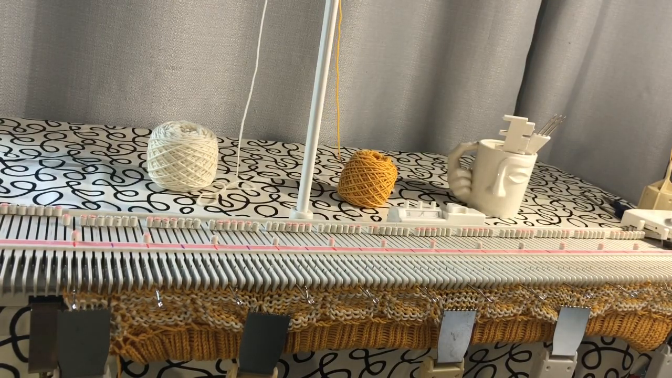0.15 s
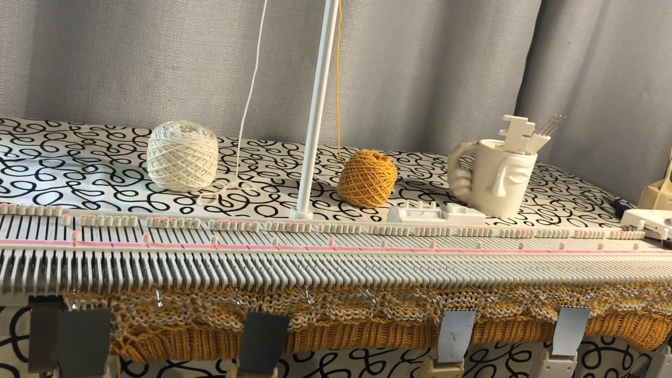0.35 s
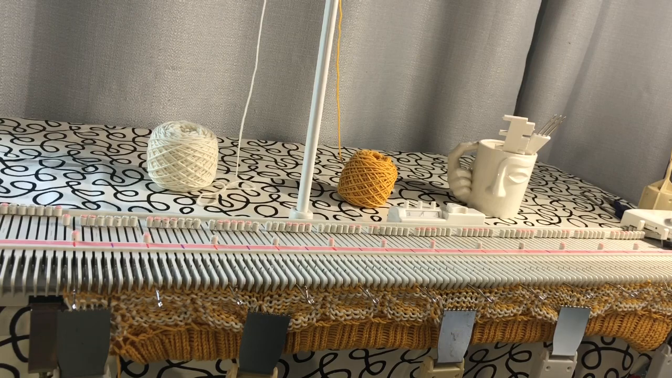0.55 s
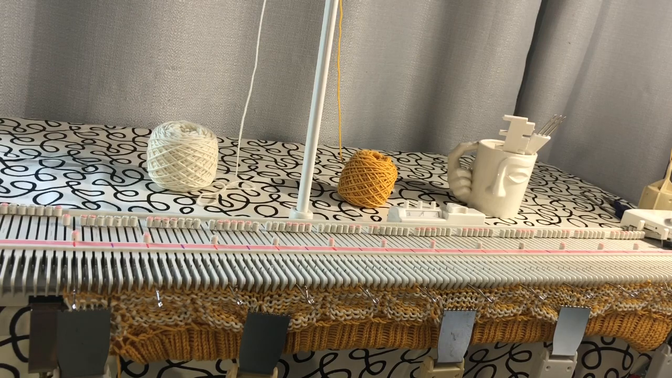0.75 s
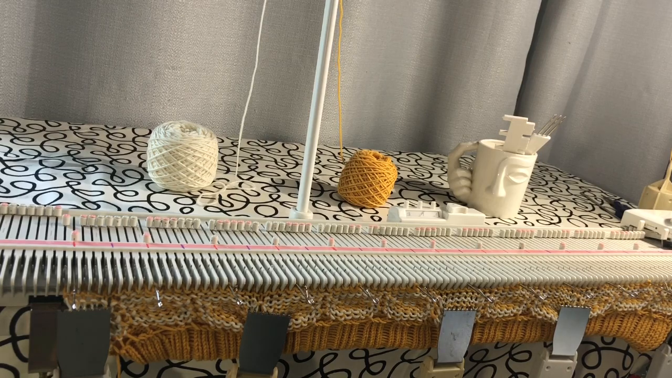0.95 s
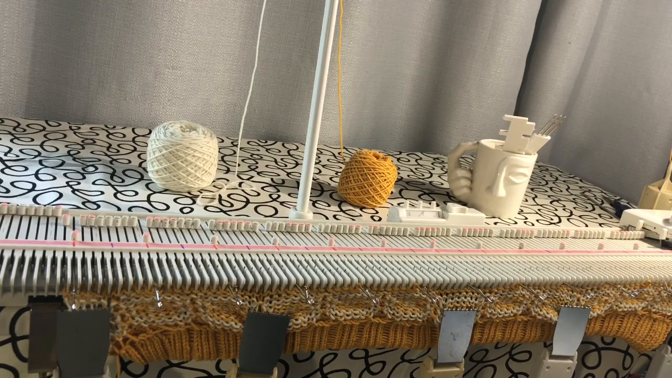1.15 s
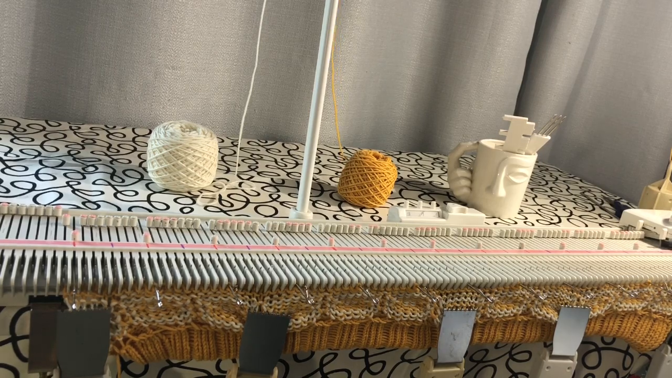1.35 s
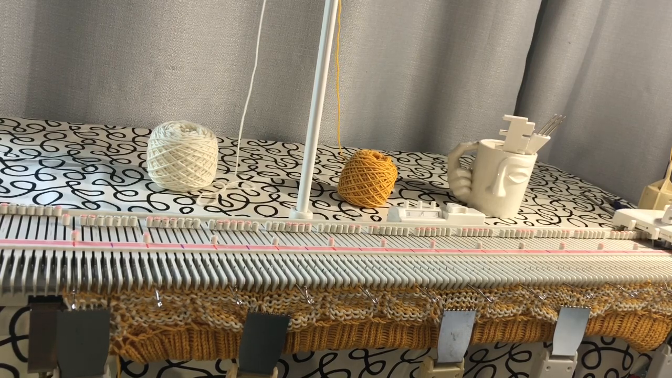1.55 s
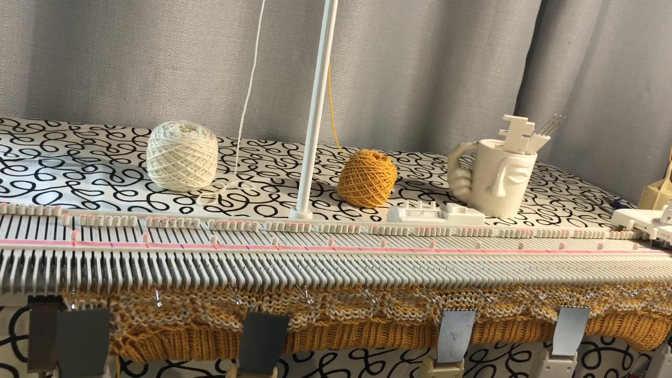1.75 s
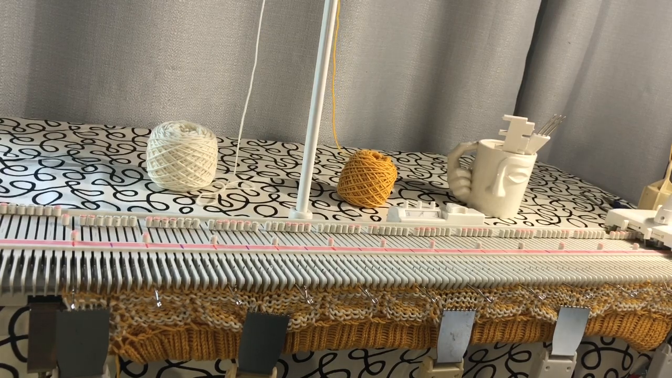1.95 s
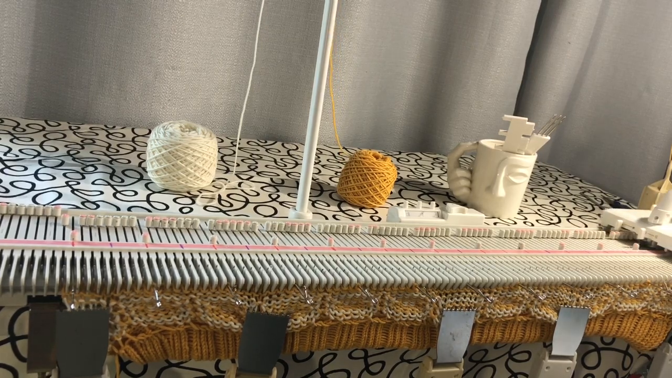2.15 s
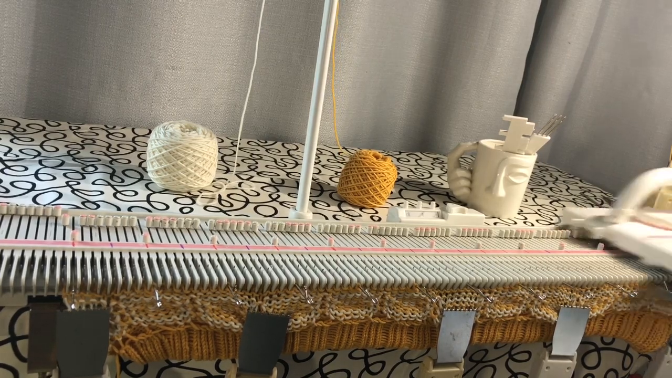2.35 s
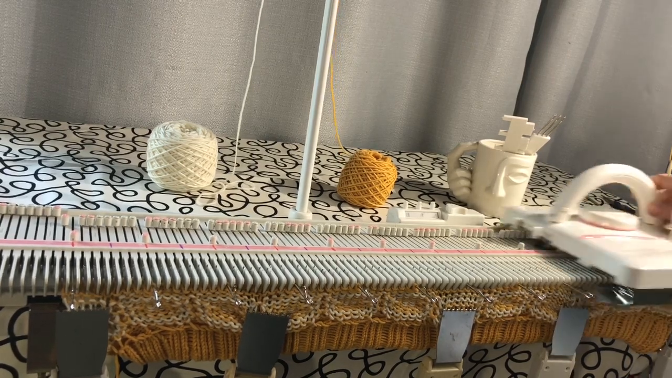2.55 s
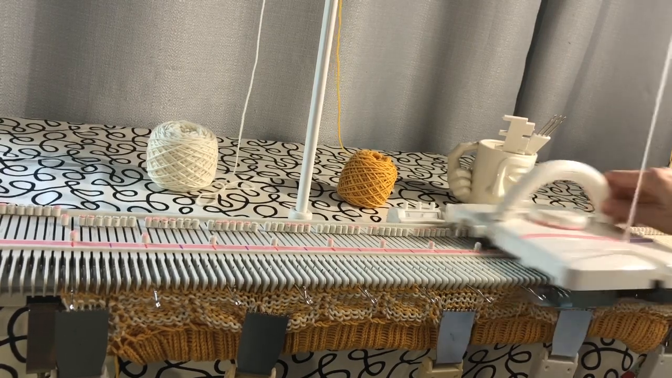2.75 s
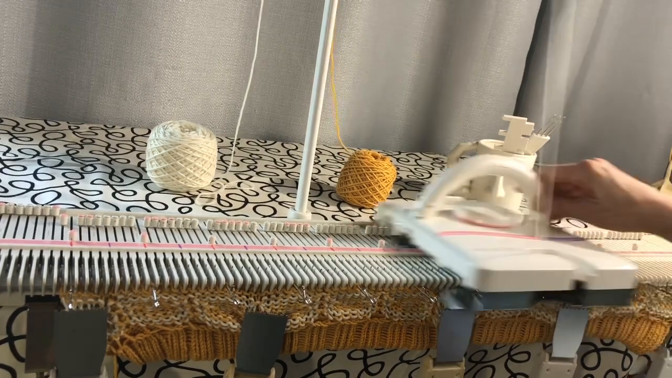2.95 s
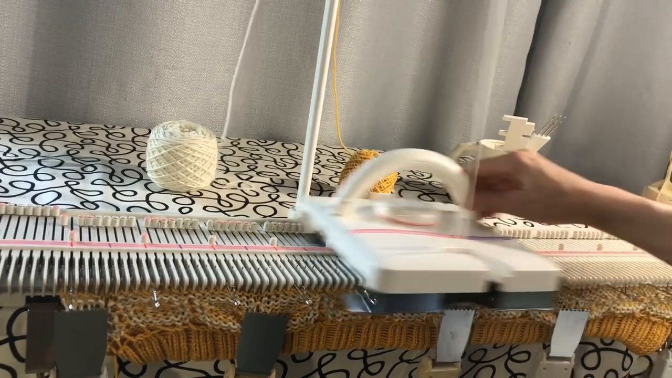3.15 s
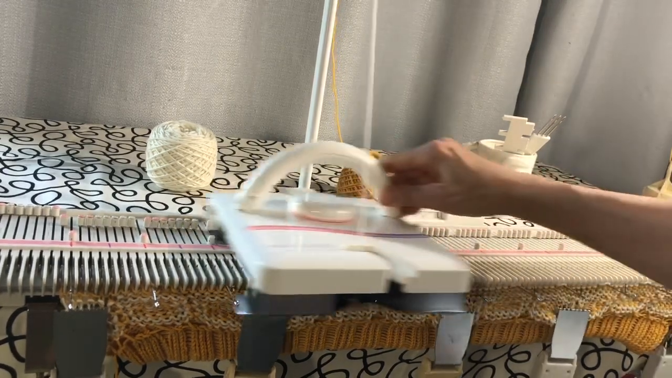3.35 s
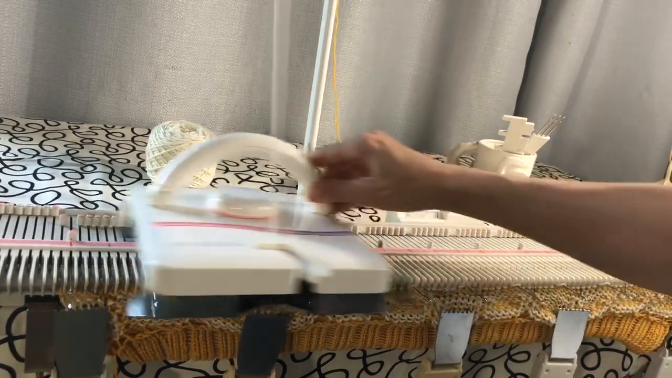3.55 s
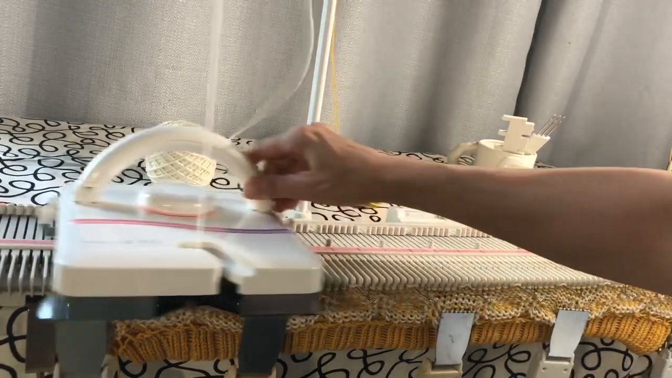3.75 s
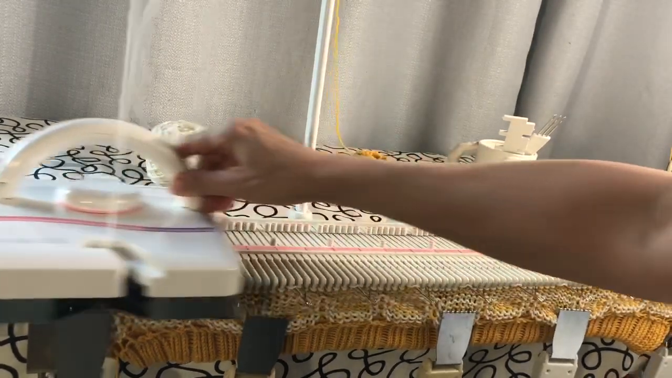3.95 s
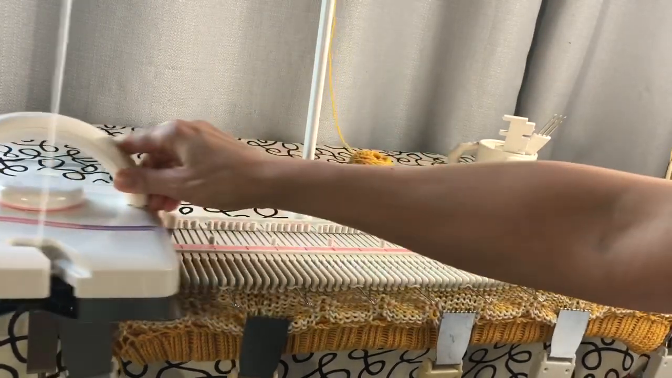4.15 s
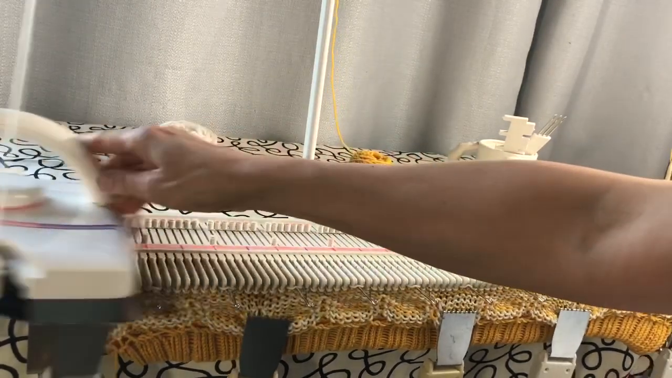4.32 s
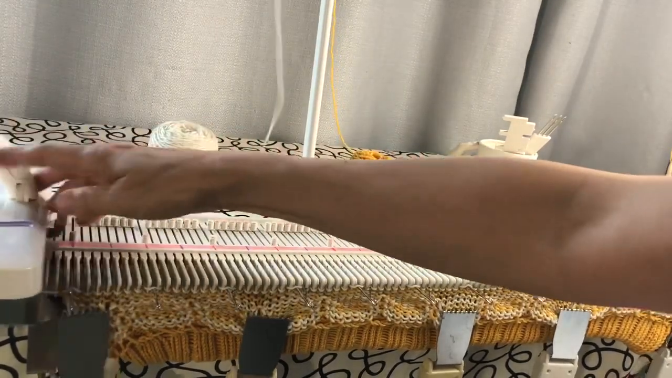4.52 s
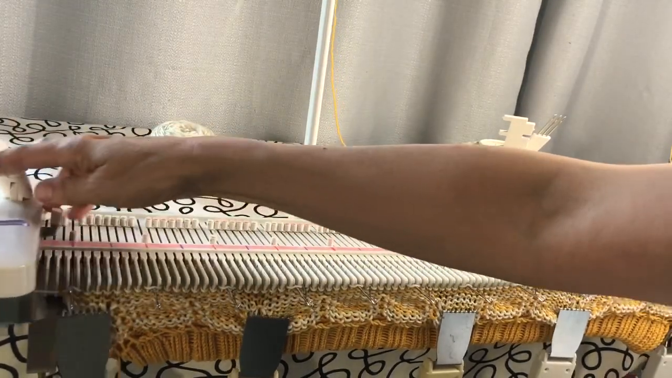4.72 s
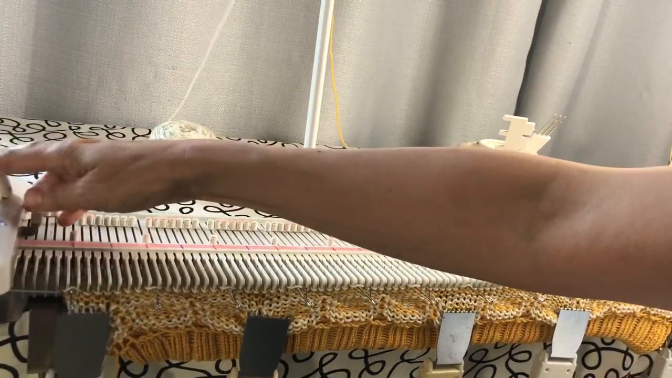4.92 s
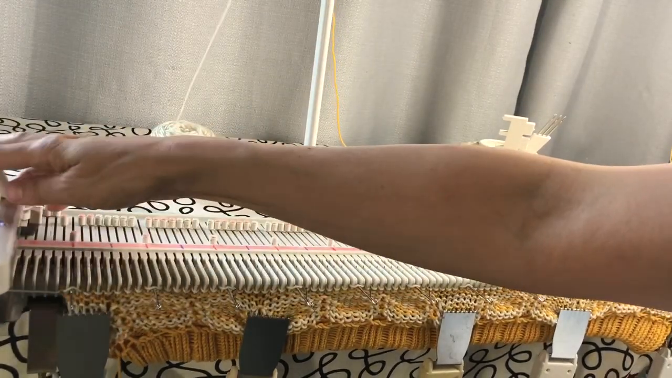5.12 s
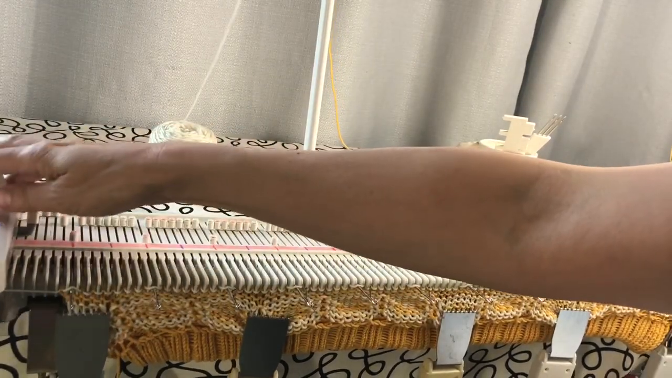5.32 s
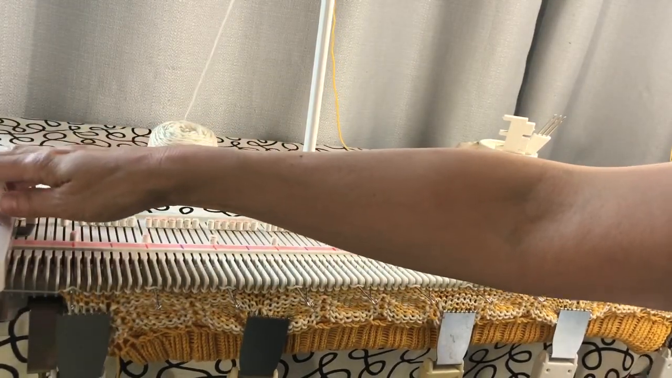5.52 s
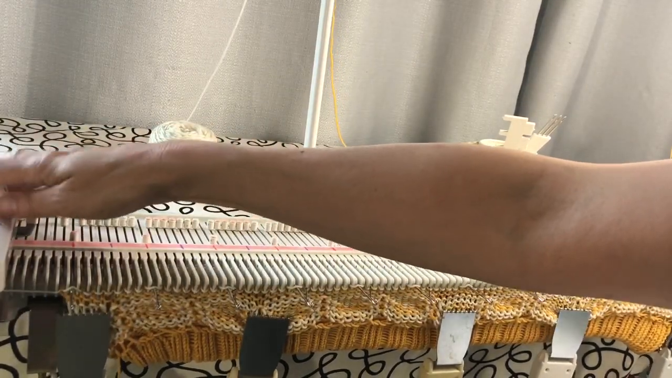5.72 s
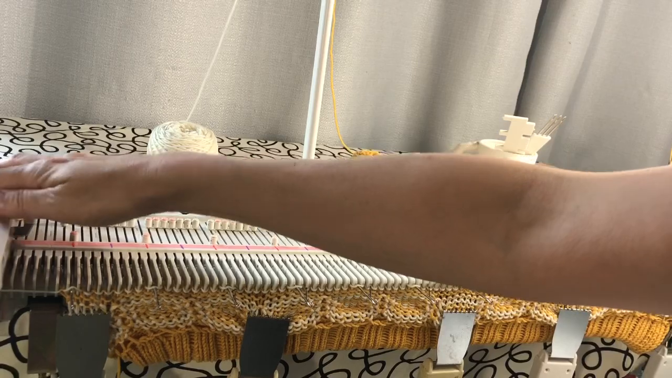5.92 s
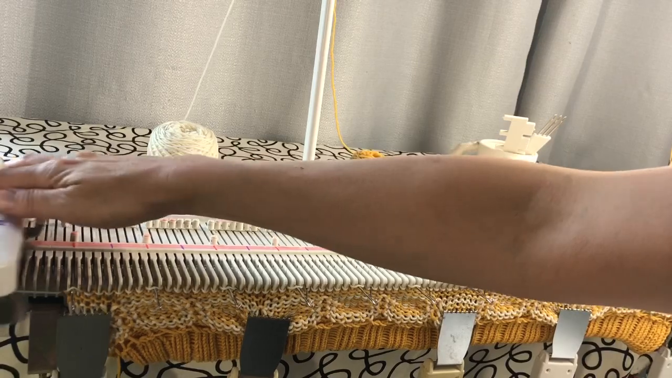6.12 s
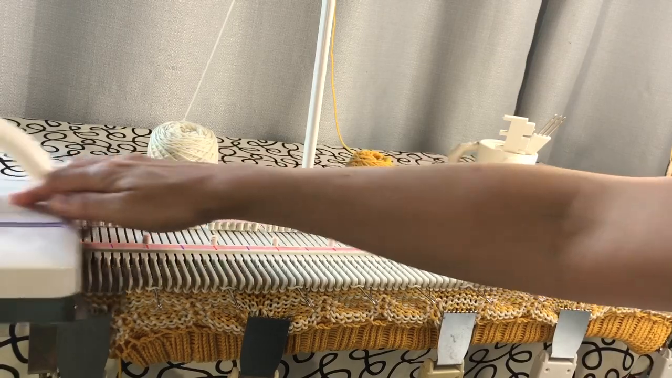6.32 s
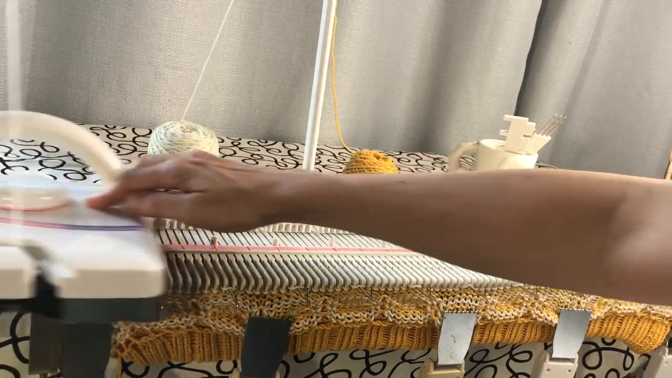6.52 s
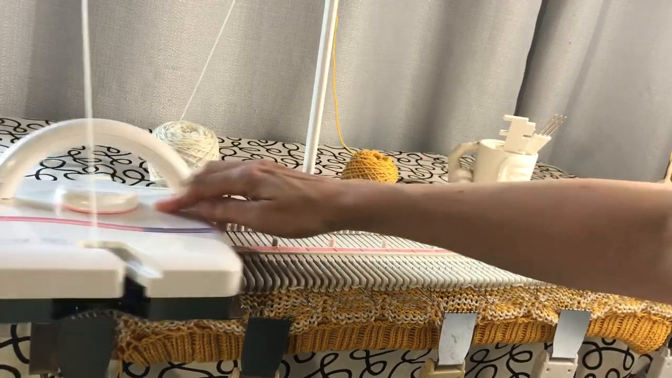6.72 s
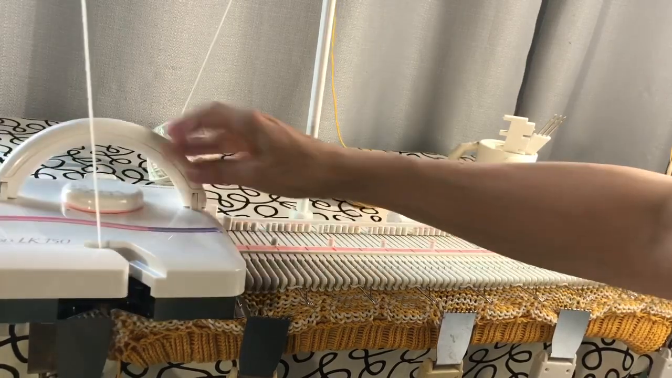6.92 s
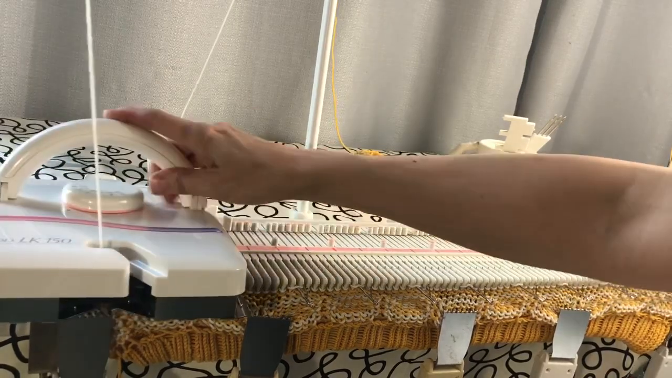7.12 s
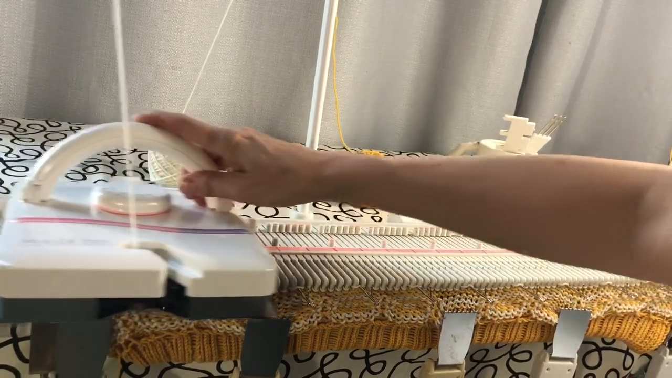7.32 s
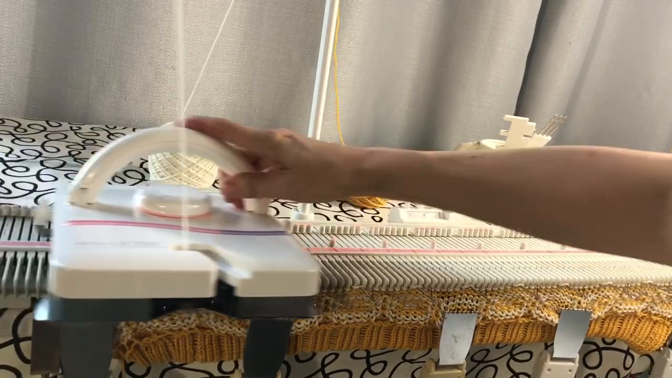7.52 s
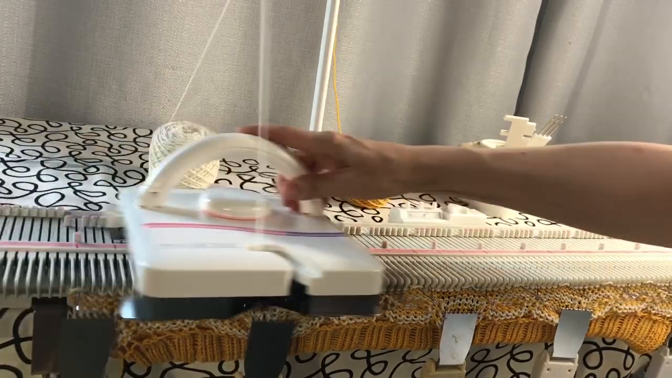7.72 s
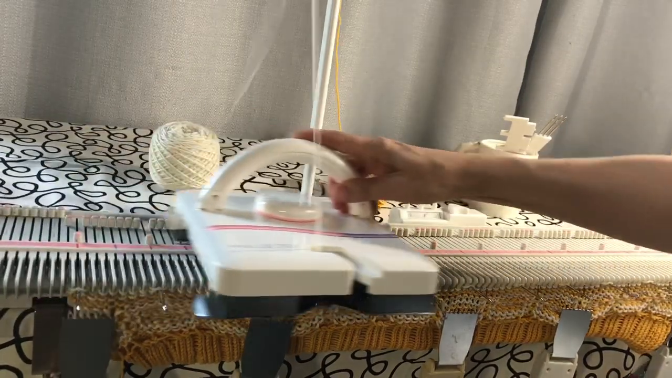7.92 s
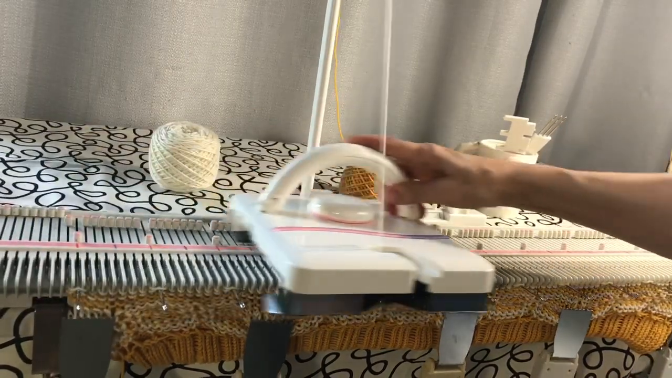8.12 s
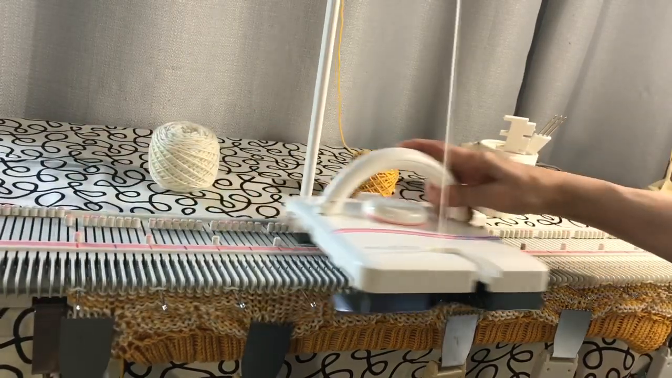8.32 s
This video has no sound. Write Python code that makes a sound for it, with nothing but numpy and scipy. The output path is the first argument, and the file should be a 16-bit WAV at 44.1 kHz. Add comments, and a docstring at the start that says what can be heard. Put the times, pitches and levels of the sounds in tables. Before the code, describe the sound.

Near silence with small clicks, then a loud metallic ratcheting sweep over a needle bed, a knock, quiet creaking, and a softer returning rattle.

```python
"""A knitting machine carriage is pushed by hand along its needle bed in a curtained room, left, then back. Cams
drive the steel needles: dense random contacts ring them, with louder single ticks; brief sines add thin squeaks
and needle pings. The plastic housing scrapes and knocks through its own resonances, and the handle creaks
through them too; the table rumbles as shaped noise. Between the passes something soft slides: swells of the
same clatter, scrape and rumble. A diffuse room tail and a steady hush lie behind."""
import sys
import numpy as np
from scipy import signal
from scipy.io import wavfile
from scipy.ndimage import uniform_filter1d

SR = 44100
rng = np.random.default_rng(int(sys.argv[2]) if len(sys.argv) > 2 else 0)


def generate_wav(signal):
    """Clip the signal to [-1, 1] and save it as 16-bit WAV at the path in sys.argv[1]."""
    frames = np.transpose(np.atleast_2d(signal))
    scaled = np.clip(frames, -1, 1) * 32767
    pcm = np.round(scaled).astype(np.int16)
    wavfile.write(sys.argv[1], SR, pcm)


N = 369116

# Three carriage pushes, one list each. Each row: time in seconds, needle clatter level in dB.
PUSHES = [
    [(2.03, -81), (2.12, -49), (2.22, -52), (2.3, -28.5), (2.37, -25.5), (2.44, -38), (2.54, -30),
     (2.63, -37), (2.75, -27), (2.82, -27.5), (2.88, -34.5), (2.94, -30.5), (3.1, -29), (3.24, -29.5),
     (3.39, -35.5), (3.43, -30.5), (3.58, -32), (3.69, -43.5), (3.74, -35.5), (3.94, -34), (4.01, -46),
     (4.18, -57), (4.24, -53), (4.33, -44.5), (4.42, -70), (4.5, -66.5)],
    [(6.25, -79), (6.32, -49.5), (6.43, -41.5), (6.52, -46.5), (6.58, -35), (6.7, -46), (6.77, -80.5)],
    [(7.12, -70.5), (7.2, -49), (7.28, -41.5), (7.42, -44.5), (7.53, -40), (7.6, -35.5), (7.72, -41.5),
     (7.79, -35), (7.92, -39), (8.08, -34), (8.14, -41.5), (8.24, -33.5), (8.3, -36.5), (8.37, -30)],
]
# Load of each push on the machine. Each row: added housing scrape in dB, table rumble in dB, ring share in dB.
PUSH_LOADS = [(0, 0, -0.5), (1, -4, -2.5), (-0.5, -4, 1.5)]
REST_CLATTER_DB = -79.5


def pushes_db():
    """The carriage drives the clatter level (the push under way, else rest); each push loads the machine."""
    t = np.arange(N) / SR
    levels_db = [np.interp(t, *np.transpose(push), left=REST_CLATTER_DB, right=REST_CLATTER_DB)
                 for push in PUSHES]
    push_starts_s = [push[0][0] for push in PUSHES]
    which = np.maximum(np.searchsorted(push_starts_s, t) - 1, 0)
    scrape_load_db, rumble_load_db, share_load_db = np.transpose(PUSH_LOADS)[:, which]
    return np.max(levels_db, axis=0), scrape_load_db, rumble_load_db, share_load_db - 7.5


# Rings the cams favour along the way. Each row: time in seconds, needle ring in Hz, housing ring in Hz.
FAVOURED_RINGS = [(0, 6200, 1160), (1.4, 5560, 1480), (2.2, 6200, 2430), (2.45, 6200, 2300),
                  (2.6, 6200, 1830), (3.35, 6000, 1810), (3.45, 4330, 1700), (3.95, 4200, 1500),
                  (4.05, 8300, 1110), (4.4, 8320, 1150), (5.3, 5670, 1826), (6.25, 4800, 1148),
                  (6.7, 5540, 1160), (7.15, 5500, 1140), (7.45, 5360, 1100), (7.55, 6200, 1540),
                  (7.8, 5900, 1240), (8.37, 6200, 1640)]


def favoured_hz():
    """The favoured needle and housing pitches glide as the carriage travels."""
    s, needle_hz, housing_hz = np.transpose(FAVOURED_RINGS)
    t = np.arange(N) / SR
    return np.interp(t, s, needle_hz), np.interp(t, s, housing_hz)


# Broad colour of needle contacts. Each row: frequency in Hz, relative density in dB.
CLATTER_SPECTRUM = [(1470, -46), (2500, -19), (4720, -6), (6170, -2.5), (7030, -4), (13200, -5.5),
                    (15600, -11)]
# Needle resonances. Each row: frequency in Hz, width in Hz, relative level in dB.
NEEDLE_RINGS = [(4187, 150, -3), (4930, 750, -14), (5385, 180, -7), (6110, 205, -4.5), (8160, 770, -9),
                (8420, 350, -2.5), (9210, 470, -0.5), (10990, 350, -3), (11590, 120, -16),
                (13200, 360, -15.5)]


def needle_clatter(clatter_db, share_db, needle_hz, pace, grain, slide_gain):
    """Cams drive the steel needles in dense contacts that ring them."""
    clatter = rattle(CLATTER_SPECTRUM, NEEDLE_RINGS, needle_hz, share_db, grain, per_s=900.0 * pace,
                     spread_db=4.5, decay_s=0.0035, fall_db=5.0, patchy_db=1.0)
    return clatter * (from_db(clatter_db) + slide_gain)


# Single needle ticks. Each row: start in seconds, nominal peak in dB, strongest ring in Hz.
TICKS = [(0.6031, -32, 3580), (0.9996, -49, 3780), (1.058, -55, 4330), (1.4601, -50, 4450),
         (1.4908, -36.5, 4510), (1.5464, -39, 5080), (1.7872, -31, 8000), (1.8158, -35.5, 3600),
         (1.9345, -40, 11700), (2.0376, -44, 3610), (2.0747, -44, 12900), (2.105, -27.5, 6220),
         (2.1251, -43, 7330), (2.1477, -27.5, 7900), (2.1843, -30.5, 5180), (2.1994, -25, 12400),
         (2.2276, -26, 5730), (2.2478, -21, 4980), (2.2643, -15, 6100), (2.297, -27, 8800),
         (2.3712, -5, 13100), (2.4695, -22, 10600), (2.4907, -19, 5350), (2.5585, -24, 5880),
         (2.599, -25, 5780), (2.676, -14, 4240), (2.882, -19, 6090), (2.9243, -7.5, 6100),
         (3.016, -17, 6150), (3.3383, -24, 6050), (3.4037, -12, 6040), (3.5239, -25, 4330),
         (3.5854, -7.5, 8680), (3.605, -14.5, 9830), (3.6327, -16, 8730), (3.668, -16.5, 8730),
         (3.704, -15, 8600), (3.7307, -11.5, 8540), (3.799, -13, 6180), (3.8252, -14.5, 5850),
         (3.972, -14, 6740), (3.9958, -33, 9030), (4.0095, -17.5, 12800), (4.0275, -19, 9280),
         (4.052, -27, 5360), (4.066, -21, 8920), (4.1126, -24, 10200), (4.136, -26.5, 9820),
         (4.1986, -20.5, 8930), (4.2317, -26.5, 5250), (4.2597, -32, 9950), (4.2746, -30, 3780),
         (4.2884, -24.5, 8840), (4.3065, -26, 4370), (4.3197, -19, 7730), (4.377, -31, 3880),
         (4.4313, -14, 5400), (4.6558, -56, 3620), (5.891, -31.5, 5000), (6.2373, -44, 5560),
         (6.2726, -20.5, 5520), (6.3094, -29, 3520), (6.33, -25.5, 8420), (6.3425, -28.5, 8570),
         (6.3677, -23, 3760), (6.3938, -23, 8490), (6.4188, -28, 8420), (6.4453, -33, 4160),
         (6.471, -23.5, 4180), (6.5334, -22.5, 5100), (6.556, -20.5, 9200), (6.6337, -18.5, 5060),
         (6.658, -13, 5430), (6.69, -19, 8100), (6.74, -37, 8240), (6.873, -41, 5940),
         (7.0239, -52.5, 4460), (7.0569, -57, 4430), (7.0932, -30.5, 4630), (7.112, -43.5, 7990),
         (7.1387, -33, 5620), (7.1554, -20.5, 11400), (7.186, -25, 5530), (7.204, -23, 8440),
         (7.217, -20.5, 5540), (7.2633, -17.5, 8250), (7.2937, -14, 8420), (7.3332, -20, 8500),
         (7.381, -21, 5400), (7.428, -16.5, 8970), (7.4676, -13.5, 5430), (7.503, -15, 8870),
         (7.5313, -18, 8200), (7.5607, -10, 6200), (7.6067, -18, 6210), (7.6296, -14, 6180),
         (7.659, -19.5, 4430), (7.71, -16, 6200), (7.7567, -15.5, 6090), (7.779, -16, 6150),
         (7.8056, -11.5, 9500), (7.822, -19, 6160), (7.8481, -13.5, 6220), (7.879, -20, 6020),
         (7.9089, -19, 6200), (7.9346, -12, 6210), (7.9723, -14, 6230), (7.9944, -11.5, 6260),
         (8.0361, -16, 5980), (8.0583, -20, 6200), (8.075, -20, 9610), (8.1125, -21, 6170),
         (8.134, -13.5, 5600), (8.1547, -14, 11700), (8.1703, -17, 6320), (8.1963, -16, 5990),
         (8.2307, -12, 6060), (8.257, -14.5, 9150), (8.2886, -15, 11600), (8.3205, -14, 11500),
         (8.3394, -10.5, 8080)]


def ticks():
    """A needle butt meets a cam: cracks (dull when weak), the needle's rings, a housing puff, a rebound."""
    s, peak_db, centre_hz = np.transpose(TICKS)
    at, hit_db = cluster(s, peak_db, settle_s=0.003, spread_db=11.5, count=6)
    hard = np.clip((peak_db + 51.5) / 25, 0, 1)
    hit_hard = np.repeat(hard, 6)

    rebound_s = s + 0.010 * np.exp(rng.normal(0, 0.071, len(s)))
    bright = train(at, from_db(hit_db - 11.5) * hit_hard)
    bright += train(rebound_s, from_db(peak_db - 15.5) * hard)
    dull = bursts(train(at, from_db(hit_db - 1) * (1 - hit_hard)), 0.0015)
    dull = signal.sosfilt(signal.butter(2, 6500.0, fs=SR, output="sos"), dull)
    crack = colour(bursts(bright, 0.0013) + dull, CLATTER_SPECTRUM)

    rings = strike(NEEDLE_RINGS, at, hit_db - 5.5, np.repeat(centre_hz, 6), fall_db=21.5, spread_db=1.5)

    # weak ticks carry relatively more housing
    housing_db = np.repeat(-18.5 - 0.47 * (peak_db + 21), 6)
    housing_puff = bursts(train(at, from_db(hit_db + housing_db)), 0.0016)
    return crack + rings + colour(housing_puff, SCRAPE_SPECTRUM)


# Metal squeaks and short needle rings. Each row: time of the top in seconds, peak in dB, pitch in Hz,
# half-width to 1/e in seconds.
SQUEAKS_AND_PINGS = [(2.412, -20.5, 12300, 0.0032), (2.723, -20, 12900, .004), (2.775, -8.5, 12400, 0.0019),
                     (2.852, -14.5, 12600, 0.0027), (3.104, -10.5, 12700, 0.0016),
                     (3.131, -15.5, 12700, 0.0032), (2.78, -20, 11940, .003), (2.852, -27, 11700, 0.0022),
                     (3.133, -25, 11600, .003), (3.172, -30, 12800, .003), (3.493, -23, 12800, .004),
                     (6.88, -49, 6060, 0.0069), (6.873, -54, 7300, 0.0074), (7.098, -37, 4790, 0.0016),
                     (7.356, -31, 5450, 0.0032), (7.381, -28.5, 5450, 0.0036), (7.408, -40, 5450, 0.0033),
                     (7.956, -18, 12200, .003), (7.961, -16.5, 11600, 0.0037),
                     (8.155, -19.5, 11500, 0.0052), (8.293, -14.5, 11560, 0.0073)]


def squeaks_and_pings():
    """Brief whistles of steel on steel and short pings of struck needles, slightly rough in pitch."""
    t, out = np.arange(N) / SR, np.zeros(N)
    pitch_spread_hz = 61.0
    wobble = 2 * np.pi * np.cumsum(pitch_spread_hz * drift(300.0)) / SR
    for s, peak_db, hz, width_s in SQUEAKS_AND_PINGS:
        near = slice(round((s - 4 * width_s) * SR), round((s + 4 * width_s) * SR))
        swell = np.exp(-((t[near] - s) / width_s) ** 2)
        out[near] += from_db(peak_db) * swell * np.sin(2 * np.pi * hz * t[near] + wobble[near])
    return out


# Broad colour of the housing. Each row: frequency in Hz, relative density in dB.
SCRAPE_SPECTRUM = [(150, -43), (250, -17), (594, -4), (876, -6.5), (1140, 0.5), (1390, -3), (1810, -0.5),
                   (2640, 0.5), (5000, -4), (6500, -18), (11000, -120)]
# Housing resonances. Each row: frequency in Hz, width in Hz, relative level in dB.
HOUSING_RINGS = [(455, 93, -9), (752, 170, 1), (975, 130, -3), (1164, 160, 1), (1545, 250, 1),
                 (1810, 140, -1.5), (2266, 250, 2), (2560, 220, -5), (3136, 220, -0.5), (4094, 240, -8.5),
                 (5070, 250, -2), (5620, 270, -3.5), (6930, 500, -13)]


def housing_scrape(clatter_db, load_db, share_db, housing_hz, pace, grain, moving, slide_gain):
    """Contacts ring the plastic housing; the scrape follows the clatter at 0.71 dB per dB."""
    scrape = rattle(SCRAPE_SPECTRUM, HOUSING_RINGS, housing_hz, share_db, grain, per_s=900.0 * pace,
                    spread_db=0.0, decay_s=0.0053, fall_db=9.5, patchy_db=0.5)
    push_gain = from_db(-34.5 + load_db + 0.71 * (clatter_db + 29.5)) * moving
    return scrape * (push_gain + slide_gain + from_db(-79.5))


# Blows on the housing. Each row: start in seconds, nominal peak in dB, strongest ring in Hz.
KNOCKS = [(0.1, -44.5, 780), (0.606, -20.5, 910), (0.888, -54, 552), (1.002, -47.5, 2700),
          (1.059, -49.5, 1190), (1.108, -53, 767), (1.34, -53.5, 1310), (1.435, -38.5, 552),
          (1.491, -47, 2980), (1.545, -40, 2550), (2.342, -22, 2420), (2.819, -23, 1780),
          (2.924, -14, 1810), (2.939, -24, 1950), (3.577, -22, 2160), (4.237, -23, 1150),
          (4.333, -27.5, 910), (4.43, -11.5, 2630), (4.652, -42, 1770), (4.721, -49, 1960),
          (4.754, -42.5, 1670), (4.787, -40, 1780), (4.977, -56.5, 2600), (5.89, -40.5, 2220),
          (6.281, -28.5, 2560), (6.584, -44, 1130), (6.608, -34, 1100), (6.661, -27.5, 1140),
          (6.823, -48.5, 675), (6.97, -52, 791), (7.159, -30, 1160), (7.218, -30, 1130),
          (7.556, -20.5, 1590)]


def knocks():
    """A blow rings the housing, gives a dull puff and leaves loose parts rattling out."""
    s, peak_db, centre_hz = np.transpose(KNOCKS)
    # negative spread: each contact is up to 2 dB stronger, by chance
    at, hit_db = cluster(s, peak_db, settle_s=0.006, spread_db=-2.0, count=12)
    rings = strike(HOUSING_RINGS, at, hit_db - 12, np.repeat(centre_hz, 12), fall_db=12.5, spread_db=5.5)
    puff = bursts(train(at, from_db(hit_db - 22.5)), 0.0015)
    tail = bursts(train(s, from_db(peak_db - 27)), 0.034)
    return rings + colour(puff + tail, SCRAPE_SPECTRUM)


def shakes():
    """Each blow also shakes the table: a decaying gain for its rumble."""
    s, peak_db, _ = np.transpose(KNOCKS)
    decay_s = 0.022
    clicks = train(s, from_db(-45 + 0.59 * peak_db))
    return signal.lfilter([1], [1, -np.exp(-1 / (decay_s * SR))], clicks + 1e-18)


# Stick-slip creaks. Each row: start in seconds, end in seconds, slips per second, nominal level at the end
# in dB, favoured ring in Hz, fall in dB per octave.
CREAKS = [(1.647, 1.711, 108, -45.5, 2930, 9), (4.501, 4.626, 58, -38.5, 1770, 34),
          (4.833, 4.936, 58, -51, 1820, 26), (5.066, 5.078, 180, -55.5, 1490, 6.5),
          (5.096, 5.145, 235, -53.5, 1154, 8.5), (5.2, 5.251, 150, -45.5, 1500, 4.5),
          (5.717, 5.762, 310, -49.5, 2570, 12), (5.785, 5.842, 390, -46, 2520, 8)]


def creaks():
    """Nearly regular slips of the handle, growing through each creak, crack and ring the housing's resonances."""
    rings, cracks = 0, 0
    for start, end, per_s, level_db, centre_hz, fall_db in CREAKS:
        gaps_s = np.exp(0.093 * rng.standard_normal(64)) / per_s
        s = start + np.cumsum(gaps_s) - gaps_s[0]
        growth_db = 1.2 * ((s - start) / (end - start) - 1)
        slip_db = level_db + growth_db - 200 * (s > end)  # slips past the end are silenced
        rings = rings + strike(HOUSING_RINGS, s, slip_db, centre_hz, fall_db, spread_db=2.5)
        cracks = cracks + train(s, from_db(slip_db - 1 - 0.98 * fall_db))
    cracks = bursts(cracks, 0.00053)
    return rings + colour(cracks, SCRAPE_SPECTRUM) + from_db(-4) * colour(cracks, CLATTER_SPECTRUM)


# Soft slides. Each row: start in seconds, top in seconds, end in seconds, bright clatter in dB,
# housing scrape in dB, table rumble in dB.
SLIDES = [(.66, .78, 1.04, -82, -82, -79), (1.098, 1.302, 1.5, -76, -85, -91),
          (1.4, 1.5, 1.73, -79, -62.5, -59.5), (1.738, 1.905, 2.03, -72, -64, -62.5),
          (4.194, 4.308, 4.49, -69, -49.5, -56), (4.45, 4.51, 4.85, -77.5, -60.5, -63.5),
          (5.306, 5.5, 5.58, -62.5, -60, -74.5), (5.505, 5.615, 5.92, -70, -60.5, -60),
          (6.02, 6.215, 7.3, -72, -64.5, -71.5), (6.943, 7.064, 7.2, -74, -65, -62.5)]


def slides():
    """Something soft slides: gains of clatter, scrape and rumble swell to a top, then fade."""
    t, gains = np.arange(N) / SR, np.zeros((3, N))
    edge_db = -13.5  # either end, relative to the top
    for start, top, end, *level_db in SLIDES:
        shape = from_db(np.interp(t, [start, top, end], [edge_db, 0, edge_db]))
        shape = shape * (t > start) * (t < end)
        gains += from_db(level_db)[:, None] * uniform_filter1d(shape, size=1000)
    return gains


# Colour of the table rumble. Each row: frequency in Hz, relative density in dB.
RUMBLE_SPECTRUM = [(12, -63.5), (20, -37), (80, -13.5), (119, -6.5), (134, 4), (184, -9.5), (228, -6),
                   (331, -8.5), (400, -4), (520, -26), (880, -120)]


def table_rumble(clatter_db, load_db, moving, slide_gain):
    """The table answers with unsteady low noise that follows the clatter at 0.44 dB per dB."""
    noise = colour(rng.standard_normal(N), RUMBLE_SPECTRUM, size=8191)
    rumble = rms_one(noise * from_db(2.4 * drift(13.0)))
    push_gain = from_db(-49.5 + load_db + 0.44 * (clatter_db + 32)) * moving
    return rumble * (push_gain + slide_gain + shakes() + from_db(-77.5))


# Soft bumps on the table. Each row: start in seconds, peak in dB, pitch in Hz.
THUMPS = [(4.509, -50, 150), (5.346, -48, 310), (5.554, -34.5, 160), (5.558, -41, 328)]


def thumps():
    """Soft low bumps: one short damped ring each."""
    return sum(ring(train([s], from_db(peak_db)), hz, t60_s=0.027) for s, peak_db, hz in THUMPS)


def room(x):
    """Diffuse tail: noise that dies away, the treble sooner."""
    full_t60_s, low_t60_s, low_cut_hz = 0.16, 0.28, 1300
    t = np.arange(SR // 2) / SR
    low, full = rng.standard_normal((2, len(t))) * np.clip(t / 0.0046 - 0.5, 0, 1)
    low = signal.sosfilt(signal.butter(1, low_cut_hz, fs=SR, output="sos"), low)
    tail = low * from_db(-60 * t / low_t60_s) + 1.3 * full * from_db(-60 * t / full_t60_s)
    return signal.fftconvolve(x, tail / np.sqrt(np.sum(tail ** 2)))[:N]


# Colour of the background hush. Each row: frequency in Hz, relative density in dB.
HUSH_SPECTRUM = [(12, -41.5), (20, -13), (74, 8.5), (162, 6.5), (363, 2.5), (599, 0), (688, 0.5),
                 (1170, -7.5), (1980, -26.5), (7150, -14), (15600, -31.5)]


def hush():
    """Steady coloured noise under everything."""
    return from_db(-68) * colour(rng.standard_normal(N), HUSH_SPECTRUM, size=8191)


def rattle(spectrum, rings, centre_hz, share_db, grain, per_s, spread_db, decay_s, fall_db, patchy_db):
    """Dense contacts with a broad colour; each resonance has contacts of its own and comes and goes."""
    out = colour(contacts(per_s, spread_db, decay_s, grain), spectrum)
    for hz, width_hz, level_db in rings:
        own_contacts = contacts(per_s / len(rings), spread_db, decay_s, grain)
        rung = rms_one(resonate(own_contacts, hz, width_hz))
        ring_db = level_db + share_db + nearness_db(hz, centre_hz, fall_db) + patchy_db * drift(2.0)
        out += rung * from_db(ring_db)
    return out


def contacts(per_s, spread_db, decay_s, grain):
    """Random puffs (more contacts share the same power), blended with smooth sliding."""
    sizes = from_db(spread_db * np.minimum(rng.exponential(1, N), 4))
    clicks = sizes * (rng.random(N) < per_s / SR)
    puffs = rms_one(bursts(clicks, decay_s) / np.sqrt(per_s))
    return np.sqrt(grain) * puffs + np.sqrt(1 - grain) * rng.standard_normal(N)


def cluster(s, peak_db, settle_s, spread_db, count):
    """One blow is several contacts: the first on time, the others while the parts settle."""
    chance = rng.random((len(s), count, 2))
    late_s = -settle_s * np.log(1 - 0.95 * chance[..., 0]) * (np.arange(count) > 0)
    hit_db = peak_db[:, None] - spread_db * chance[..., 1]
    return (s[:, None] + late_s).ravel(), hit_db.ravel()


def strike(rings, s, peak_db, centre_hz, fall_db, spread_db):
    """Blows ring every mode; strength falls per octave from the favoured pitch and varies by chance."""
    out, chance_db = 0, rng.normal(0, spread_db, (len(s), len(rings)))
    for k, (hz, width_hz, level_db) in enumerate(rings):
        blow_db = peak_db + level_db + nearness_db(hz, centre_hz, fall_db) + chance_db[:, k]
        out = out + resonate(train(s, from_db(blow_db)), hz, width_hz)
    return out


def nearness_db(hz, centre_hz, fall_db):
    """Modes far from the favoured pitch are struck more weakly."""
    return -fall_db * np.abs(np.log2(hz / centre_hz))


def resonate(x, hz, width_hz):
    """Ring time follows from the mode's width; the contact takes time, so the ring swells without a click."""
    contact_hz = 5.0 * width_hz
    swell = ring(x, hz, np.log(1000) / (np.pi * contact_hz)) * 2 * np.pi * contact_hz / SR
    return ring(swell, hz, np.log(1000) / (np.pi * width_hz))


def ring(clicks, hz, t60_s):
    """A unit click sets a cosine of height 1 ringing; nothing passes far below the pitch."""
    r, w = from_db(-60 / (t60_s * SR)), 2 * np.pi * hz / SR
    return signal.lfilter([0.5, 0, -0.5], [1, -2 * r * np.cos(w), r * r], clicks + 1e-18)


def train(times_s, sizes):
    """Clicks of the given sizes at the given times."""
    out = np.zeros(N)
    index = np.round(np.asarray(times_s) * SR).astype(int)
    np.add.at(out, np.minimum(index, N - 1), sizes)
    return out


def bursts(clicks, decay_s):
    """Each click opens a puff of noise that dies away."""
    envelope = signal.lfilter([1], [1, -np.exp(-1 / (decay_s * SR))], clicks + 1e-18)
    return envelope * rng.standard_normal(N)


def colour(x, spectrum, size=2047):
    """Causal (minimum-phase) filter of unit energy with the given relative density."""
    hz, (points_hz, level_db) = np.linspace(0, SR / 2, size + 1), np.transpose(spectrum)
    power = from_db(2 * np.interp(np.log(hz + 1), np.log(points_hz), level_db))
    # minimum_phase halves the dB, so power becomes amplitude
    taps = signal.minimum_phase(signal.firwin2(size, hz, power, fs=SR), n_fft=8 * (size + 1))
    return signal.fftconvolve(x, taps / np.sqrt(np.sum(taps ** 2)))[:N]


def drift(rate_hz):
    """Slow chance with spread 1: noise through two equal one-pole lowpasses."""
    r = np.exp(-2 * np.pi * rate_hz / SR)
    return rms_one(signal.lfilter([1], [1, -2 * r, r * r], rng.standard_normal(N)))


def from_db(db):
    """Amplitude ratio of a level in dB."""
    return 10 ** (np.asarray(db) / 20)


def rms_one(x):
    """Scale to an RMS of 1."""
    return x / np.sqrt(np.mean(x ** 2) + 1e-20)


def scene():
    """Carriage and housing sound in the room; rumble, thumps and hush are added without its tail."""
    clatter_db, scrape_load_db, rumble_load_db, share_db = pushes_db()
    bright_slide, housing_slide, table_slide = slides()
    needle_hz, housing_hz = favoured_hz()
    # a faster, louder carriage meets more needles
    pace = from_db(np.clip(0.54 * (clatter_db + 36.5), -8, 12))
    # at rest only smooth sliding is left
    grain = np.clip((clatter_db + 68.5) / 14, 0, 0.8)
    moving = np.clip((clatter_db - REST_CLATTER_DB) / 12, 0, 1)

    machine = needle_clatter(clatter_db, share_db, needle_hz, pace, grain, bright_slide)
    machine += ticks() + squeaks_and_pings()
    machine += housing_scrape(clatter_db, scrape_load_db, share_db, housing_hz, pace, grain, moving,
                              housing_slide)
    machine += knocks() + creaks()
    rumble = table_rumble(clatter_db, rumble_load_db, moving, table_slide)
    return (machine + from_db(-13) * room(machine) + rumble + thumps() + hush())[None]


def record(dry):
    """The microphone drops the deep bass; the top is cut steeply."""
    bass_cut_hz, top_cut_hz = 40.0, 15750
    dry = signal.sosfilt(signal.butter(1, bass_cut_hz, "high", fs=SR, output="sos"), dry)
    return signal.sosfilt(signal.ellip(10, 0.5, 60, top_cut_hz, fs=SR, output="sos"), dry)


dry = scene()
out = record(dry)
generate_wav(out)
```